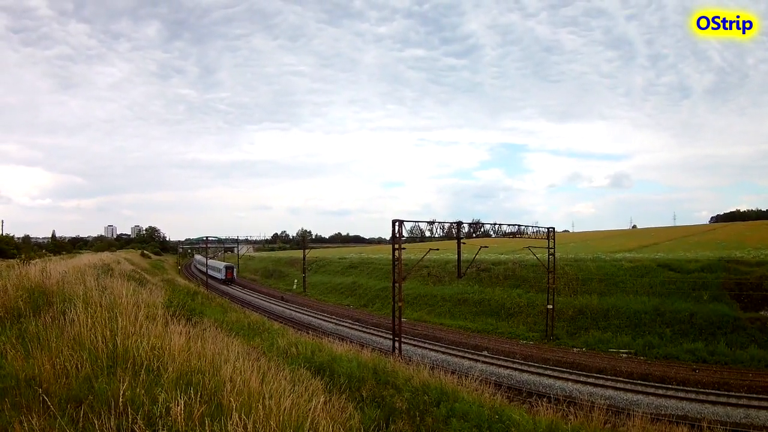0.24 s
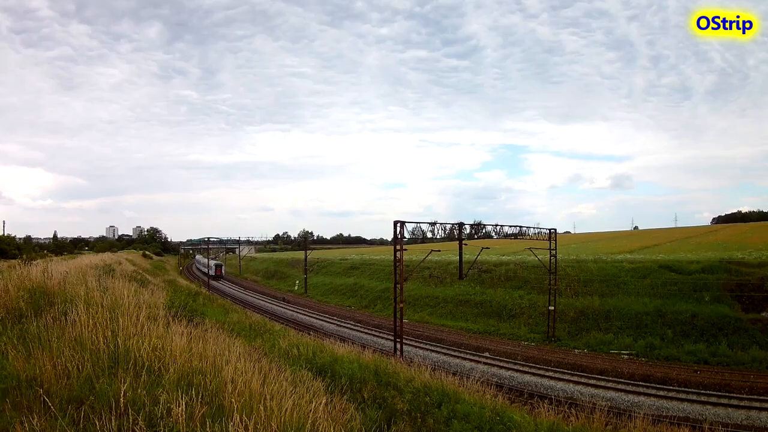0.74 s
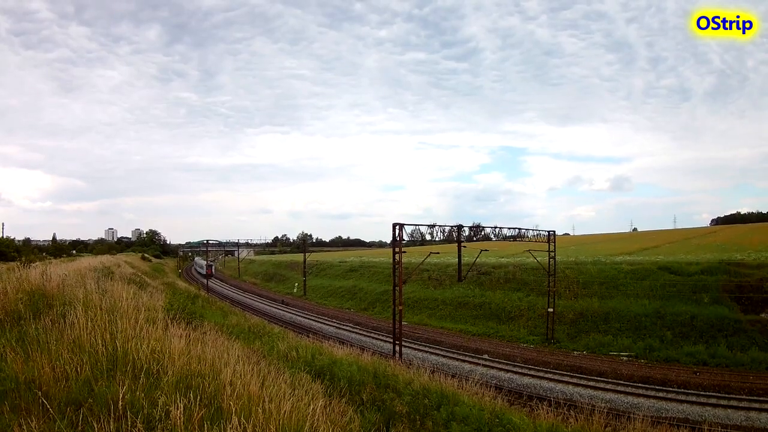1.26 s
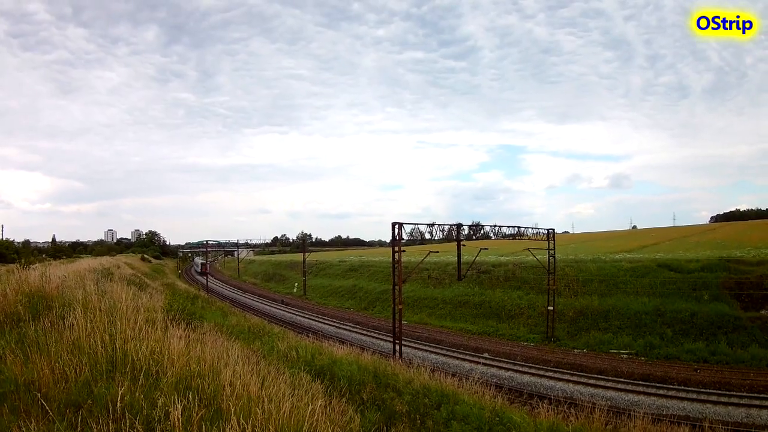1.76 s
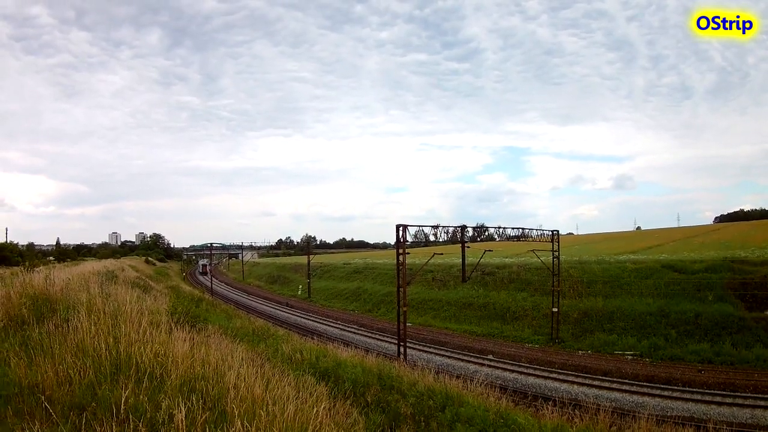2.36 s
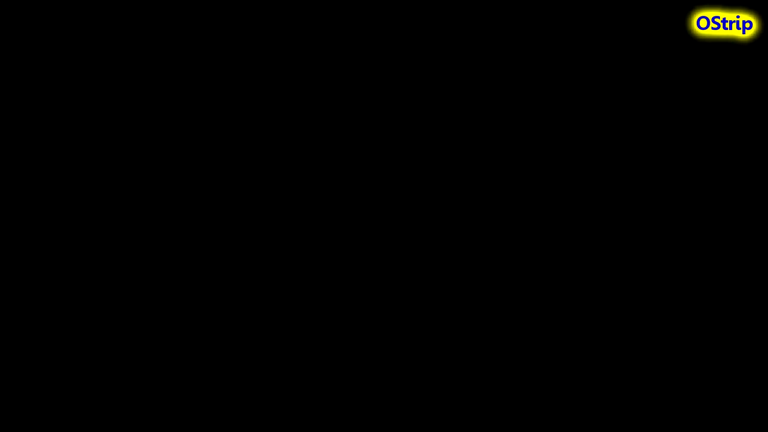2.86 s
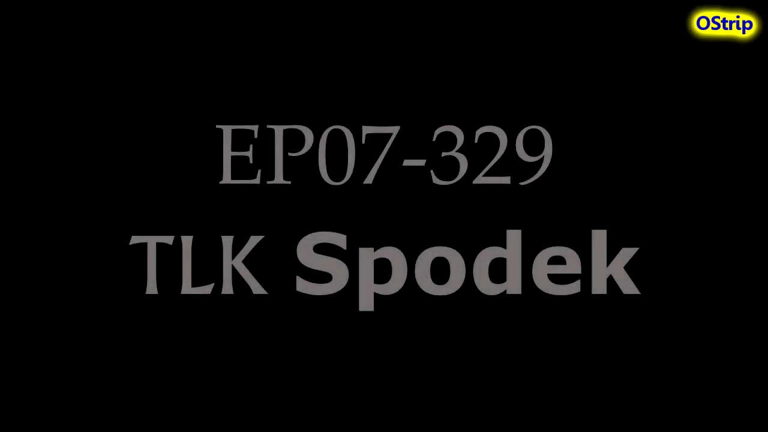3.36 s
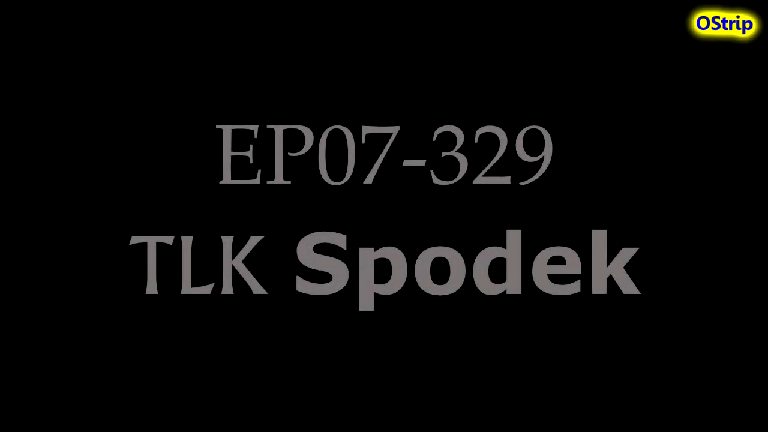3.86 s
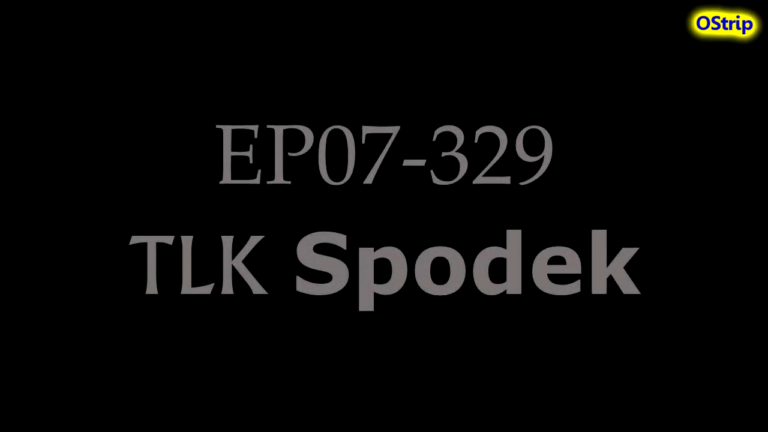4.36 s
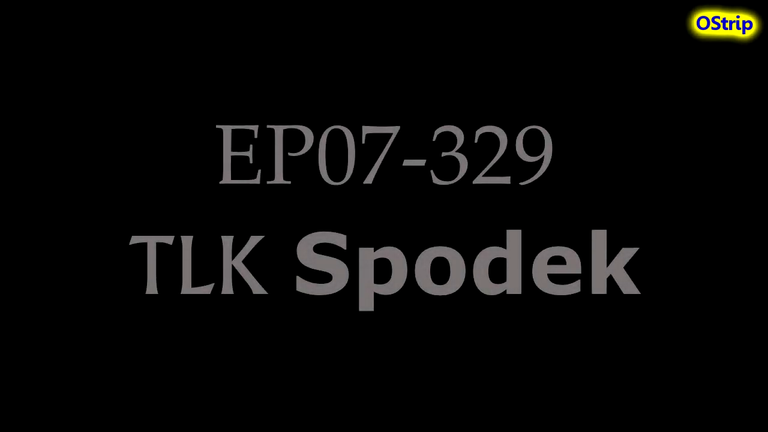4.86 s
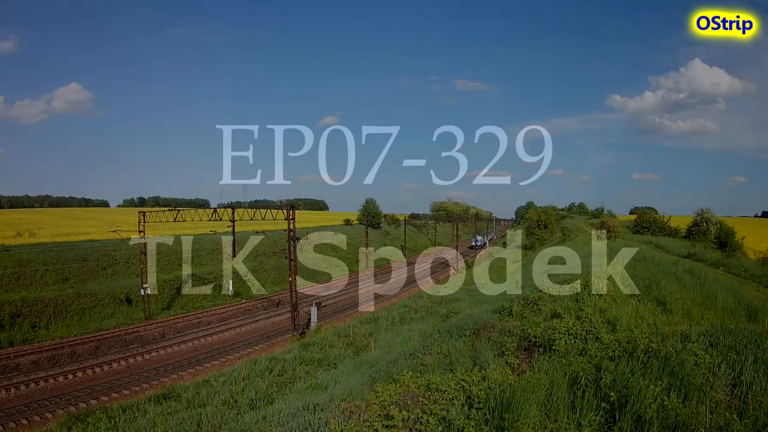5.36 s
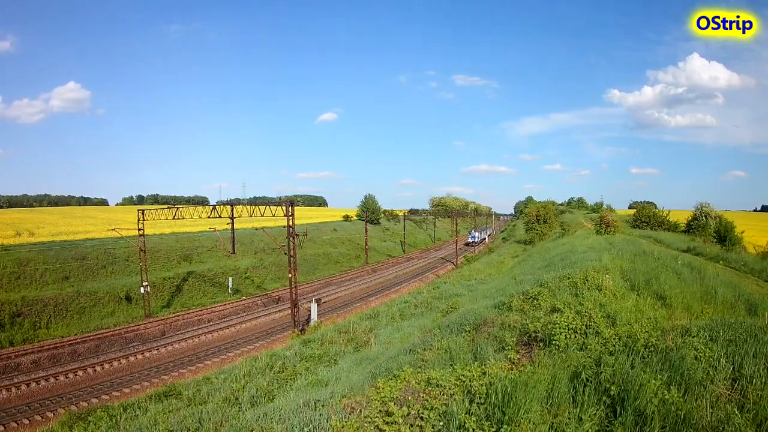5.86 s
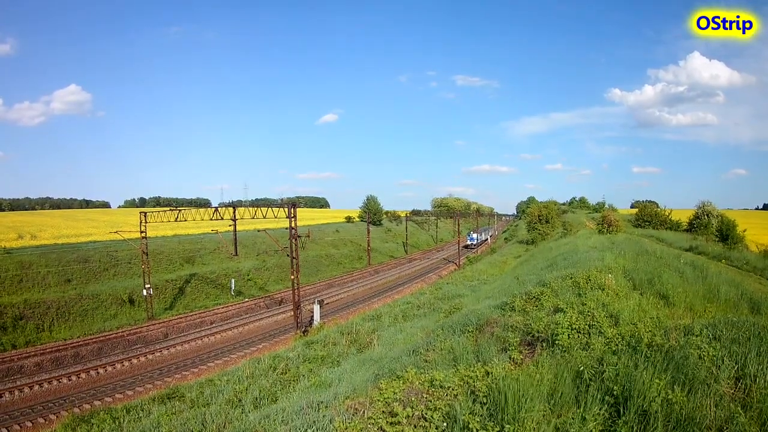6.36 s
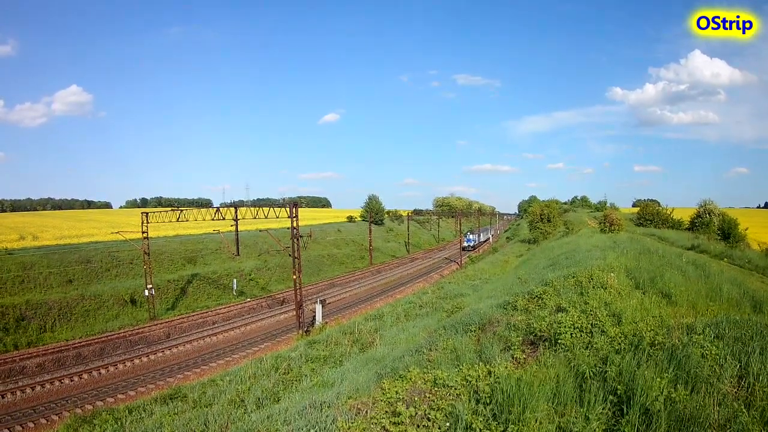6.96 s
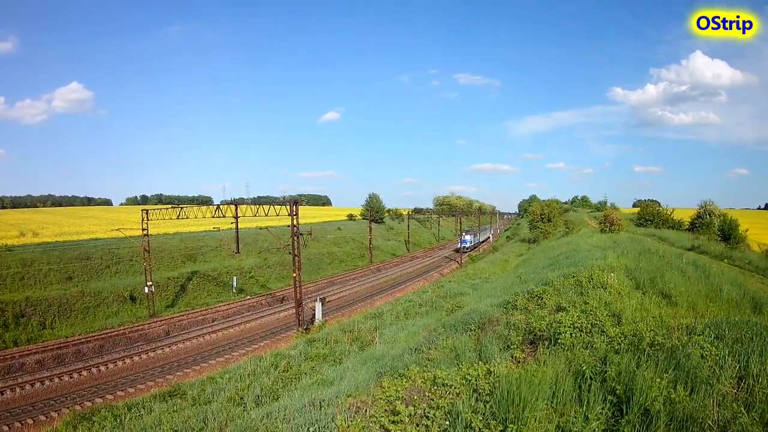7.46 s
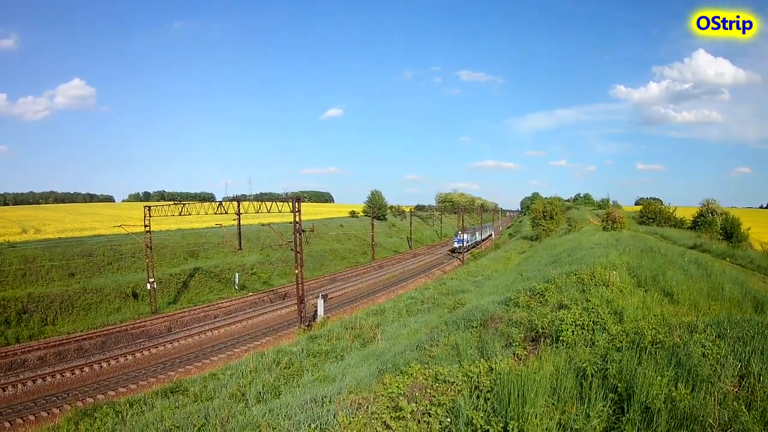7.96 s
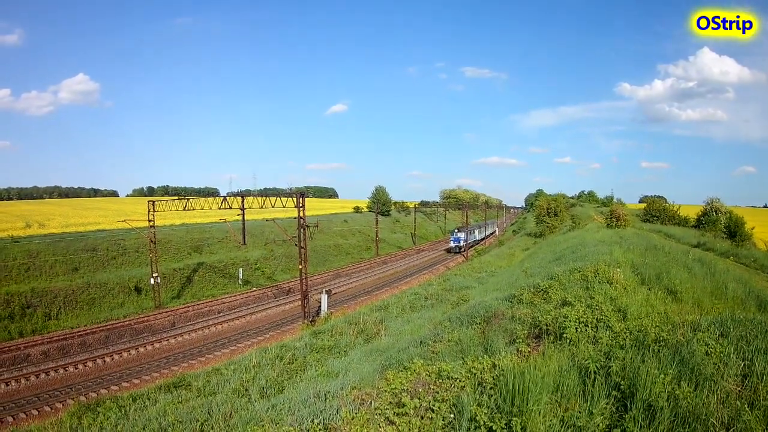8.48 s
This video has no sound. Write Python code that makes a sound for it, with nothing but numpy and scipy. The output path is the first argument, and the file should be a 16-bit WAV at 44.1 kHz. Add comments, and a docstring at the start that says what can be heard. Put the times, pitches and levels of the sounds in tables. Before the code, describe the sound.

In open fields by a wood, a close songbird repeats high buzzes and whistles, growing louder, then holds a throbbing note over the dying roar of a departing train. A quiet stretch follows, with faint, echoing whistles and a trill from far birds. Wind rumble and light hiss rise with the rush of an approaching electric train. The near bird repeats its song, joined by a few thumps and metallic clanks.

```python
"""Open fields by a wood: a train rolls away and fades out, leaving a low hush and far birds. A second place
fades in with wind, hiss and an approaching electric train, all shaped noise, joined by thumps and clanks.
Up front a songbird sings twice: ten buzz-and-whistle syllables, then a long throbbing note. Its voice is
a slightly unsteady near sine that warms up through each song and echoes off a bank and the woods."""
import sys
import numpy as np
from scipy import signal
from scipy.fft import rfft, irfft, next_fast_len
from scipy.io import wavfile
from scipy.ndimage import uniform_filter1d

SR = 44100
rng = np.random.default_rng(int(sys.argv[2]) if len(sys.argv) > 2 else 0)


def wav_out(sig):
    """Save sig, one row per channel (or a flat mono array), as 16-bit PCM at SR to the path in sys.argv[1]."""
    wavfile.write(sys.argv[1], SR, np.round(np.clip(np.atleast_2d(sig).T, -1, 1) * 32767).astype(np.int16))


N = 384552

# EQ curves of the noise beds: (frequency [Hz], relative density [dB])
WOODS_EQ = [(25, -55), (48, -36), (62, -8), (85, -2), (277, -4), (686, -10), (1490, -18), (3140, -18),
            (4570, -22), (7200, -35), (12600, -33), (14800, -47)]
WIND_EQ = [(8.8, -47), (15, -1.5), (97, -1), (275, -10.5), (418, -13.5), (524, -14), (700, -19), (910, -51),
           (1540, -120)]
HISS_EQ = [(1180, 15), (2000, -1.5), (5240, -11), (7450, -6.5), (10100, -9), (12900, -6), (13800, -33),
           (14200, -41), (14800, -60)]
LEAVING_EQ = [(12, -40.5), (22, -18), (45, -10.5), (65, -22.5), (142, -26.5), (354, -21), (669, -3),
              (1010, -6.5), (1620, -13.5), (2020, -24), (2520, -24.5), (4510, -36), (7020, -49),
              (11500, -49.5), (14800, -73.5)]
ARRIVING_EQ = [(240, -50), (400, -13.5), (560, -13.5), (715, -5.5), (819, -0.5), (1200, 1), (1440, -11.5),
               (2520, -23), (3500, -20.5), (4550, -19), (7700, -120)]
# resonances of the trains: (centre [Hz], width [Hz], boost [dB])
LEAVING_RINGS = [(798, 75, 6.5), (1002, 30, 8.5), (1076, 50, 7.5), (1365, 35, 8), (1588, 35, 6.5),
                 (2062, 83, -3.5), (2460, 230, 4.5), (6930, 300, 12.5)]
ARRIVING_RINGS = [(1176, 180, 6.5)]
# swell of the approaching train, ahead of the fade-in: (time [s], level [dB])
APPROACH = [(5.1, -51), (6.0, -47.5), (6.5, -47), (7.7, -43.5), (8.0, -38.5), (8.3, -38.8), (8.72, -35)]
# dull thumps: (time [s], level [dB])
THUMPS = [(5.881, -37), (7.812, -23.5), (8.158, -25.5)]
# short clanks: (time [s], level [dB], first pitch [Hz], last pitch [Hz])
CLANKS = [(7.85, -33, 1275, 1210), (8.076, -17.5, 1200, 1186), (8.081, -20.5, 1010, 695),
          (8.095, -25, 1130, 1040), (8.195, -25.5, 816, 820), (8.29, -27, 1260, 1207),
          (8.398, -29, 1223, 1180), (8.521, -29, 1290, 1200), (8.678, -27, 1216, 1110)]
# far bird slurs: (start [s], length [s], first [Hz], middle [Hz], last [Hz], relative level [dB])
FAR_WHISTLES = [ (2.767, .065, 3650, 3500, 3350, -66), (2.915, 0.049, 3880, 3800, 3700, -61),
                (2.955, .09, 3650, 2880, 2880, -66), (3.155, .048, 2410, 2420, 2450, -64),
                (3.265, .075, 2950, 3020, 2880, -66.5), (3.459, .15, 2310, 2270, 2240, -69),
                (3.619, .04, 2180, 2120, 2070, -68), (4.167, .1, 1487, 1580, 1620, -73),
                (4.31, 0.062, 1687, 2000, 2120, -61), (4.37, .06, 8100, 7800, 7900, -77),
                (4.39, 0.2, 2224, 2154, 2097, -63), (4.455, .115, 6000, 3350, 2610, -63),
                (4.55, .087, 1850, 1840, 1830, -64.5), (4.59, .035, 5700, 5000, 4550, -75),
                (4.623, .26, 2427, 2520, 2565, -67), (4.7, .03, 6200, 5400, 5000, -71),
                (4.75, .03, 6300, 5600, 5360, -70), (4.798, .03, 6200, 5500, 5200, -70),
                (4.797, 0.162, 1570, 1643, 1670, -67), (4.84, .08, 3950, 4090, 4150, -66),
                (4.91, .076, 3900, 3200, 2690, -62), (4.994, .14, 2280, 2480, 2560, -61.5),
                (5.047, .23, 1944, 2170, 2270, -63), (5.165, 0.081, 2800, 3390, 3070, -65.5),
                (5.305, .12, 2550, 3205, 3130, -64), (5.349, .11, 2890, 2973, 3006, -58),
                (5.584, 0.047, 2130, 2030, 1960, -58), (5.673, .13, 1850, 2050, 2065, -62),
                (5.821, .096, 2300, 2485, 2610, -60.5), (5.95, 0.34, 2140, 2130, 2117, -63),
                (6.08, .067, 2740, 2730, 2720, -67)]
# contour of the far trill: (time [s], centre pitch [Hz], relative level [dB])
FAR_TRILL = [(3.0, 4990, -79), (3.3, 4700, -75), (3.7, 4290, -68.5), (3.85, 3250, -64.5),
             (4.5, 3100, -67.5), (4.7, 3300, -74), (5.0, 3295, -70), (5.3, 2990, -93)]
# songbird's overtones: (harmonic number, level against the fundamental at gain 0.17 [dB])
OVERTONES = [(2, -40.5), (3, -35.5)]
# two songs of ten syllables: (buzz start [s], whistle end [s])
SONGS = [
    [(0.678, 0.787), (0.8428, 0.954), (1.011, 1.1234), (1.1741, 1.2827), (1.3259, 1.4359), (1.4772, 1.5893),
     (1.629, 1.7366), (1.7737, 1.8865), (1.923, 2.0368), (2.0754, 2.187)],
    [(6.9775, 7.0817), (7.141, 7.2547), (7.3112, 7.4211), (7.4669, 7.581), (7.6254, 7.7383),
     (7.7747, 7.8913), (7.9277, 8.039), (8.0745, 8.1863), (8.225, 8.3356), (8.3759, 8.4874)],
]
# contour of a buzz: (share of its length, soft level [dB], full-voice level [dB],
# dip between pulses [dB], unscaled pitch sag [Hz], pulse sweep either way [Hz])
BUZZ_SHAPE = [(-.33, -29.5, -45, 16, 70, 330), (-.2, -19, -32.5, 16.5, 70, 340),
              (0, -10, -12, 16, 70.5, 350), (.17, -4.5, -4.5, 15.5, 70, 340), (.3, -1.4, -1, 12.5, 60, 320),
              (.55, 0, -1, 8, 0, 280), (.9, -2.5, -1.5, 7.5, -105, 225), (1.05, -7.5, -5, 8.5, -150, 209),
              (1.19, -27, -26, 8.5, -160, 210)]
# pitch scoop of a whistle: (time from its end [s], unscaled offset [Hz])
WHISTLE_BEND = [(-.062, 2), (-.04, -170), (-.016, 1), (-.008, 3)]
# release of a whistle: (time from its end [s], level [dB])
WHISTLE_RELEASE = [(-.009, 0), (-.005, -1.5), (-.003, -4), (0, -7), (.003, -26), (.008, -45)]
# cues of the long notes: (start [s])
LONG_NOTE_STARTS = [2.24, 8.544]
# contour of a long note: (time from its start [s], pitch [Hz], rms level [dB], throb depth [dB])
LONG_NOTE = [(0, 4960, -52, 4), (.015, 4860, -34.5, 3), (.03, 4744, -27.5, 8.5), (.065, 4634, -24.5, 7),
             (.1, 4680, -21, 5.5), (.15, 4700, -20, 5), (.42, 4665, -19.5, 3), (.5, 4702, -19, 2.5),
             (.575, 4695, -20, 3.5), (.61, 4670, -25.5, 5.5), (.67, 4635, -27.5, 5), (.7, 4613, -31, 6),
             (.715, 4400, -51, 8)]


def undb(db):
    """Decibels to gain."""
    return 10 ** (np.asarray(db) / 20)


def curve(table, at):
    """Reads each column of a table as an envelope along its first column."""
    points, *columns = np.transpose(table)
    return [np.interp(at, points, c) for c in columns]


def add(out, start_s, sound):
    """Mixes a short sound in on its cue."""
    i = int(start_s * SR)
    out[i:i + len(sound)] += sound[:N - i]


def fade(x, seconds):
    """Fades both ends."""
    t = np.arange(len(x)) / SR
    return x * np.clip(np.minimum(t, t[::-1]) / seconds, 0, 1)


def tone(hz, gain):
    """A sine that follows pitch and gain."""
    return gain * np.sin(2 * np.pi * np.cumsum(hz) / SR + 2 * np.pi * rng.random())


def wander(rate_hz):
    """A smooth random modulator with a spread near 1."""
    hold = int(SR / rate_hz)
    steps = np.repeat(rng.standard_normal(N // hold + 1), hold)
    return 1.44 * uniform_filter1d(uniform_filter1d(steps, hold), hold)[:N]


def noise_bed(eq, band_hz, rings=(), *, flicker_db, flicker_hz=9):
    """Shaped noise, rms near 1 inside the band; each octave flickers on its own."""
    size = next_fast_len(N)
    hz = np.arange(1, size // 2 + 2) * SR / size
    eq_hz, eq_db = np.transpose(eq)
    db = np.interp(np.log(hz), np.log(eq_hz), eq_db, -200, -200)
    db += sum(boost / (1 + (2 * (hz - centre) / width) ** 2) for centre, width, boost in rings)
    gain = undb(db)
    in_band = (hz > band_hz[0]) & (hz < band_hz[1])
    gain /= np.sqrt(np.sum(gain[in_band] ** 2) * 2 / size)
    spectrum = rfft(rng.standard_normal(size)) * gain
    octave = np.log2(hz / 1000)
    bands = (irfft(spectrum * np.clip(1 - abs(octave - k), 0, 1), size)[:N] for k in range(-6, 5))
    return sum(band * undb(flicker_db * wander(flicker_hz)) for band in bands)


def echoes(x, t60_s, predelay_s):
    """Scattered returns from trees and ground: a noise tail of unit energy."""
    t = np.arange(int(t60_s * SR)) / SR
    tail = rng.standard_normal(len(t)) * undb(-60 * t / t60_s) * (t > predelay_s)
    return signal.fftconvolve(x, tail / np.sqrt(np.sum(tail ** 2)))[:N]


def woods():
    """A steady low hush under everything."""
    return noise_bed(WOODS_EQ, (25, 15000), flicker_db=.04) * undb(-59.5)


def wind():
    """A low rumble that breathes in gentle gusts."""
    rumble = noise_bed(WIND_EQ, (20, 300), flicker_db=.5, flicker_hz=6.9)
    return rumble * undb(-42 + 1.33 * wander(2.495))


def hiss():
    """A thin, flickering hiss."""
    return noise_bed(HISS_EQ, (6500, 9000), flicker_db=1.75) * undb(-58.5)


def leaving_train():
    """A rolling roar with ringing mids."""
    return noise_bed(LEAVING_EQ, (450, 1800), LEAVING_RINGS, flicker_db=.5) * undb(-31.5)


def arriving_train(t):
    """The electric train's midrange rush swells as it nears."""
    rush = noise_bed(ARRIVING_EQ, (700, 1700), ARRIVING_RINGS, flicker_db=1.5, flicker_hz=14)
    return rush * undb(curve(APPROACH, t)[0])


def knock(db, first_hz, last_hz, t60_s):
    """A damped sine hit whose pitch settles fast."""
    t = np.arange(int(t60_s * SR)) / SR
    hz = last_hz + (first_hz - last_hz) * np.exp(-t / .0113)
    attack = np.minimum(t / .0017, 1)
    return tone(hz, undb(db - 60 * t / t60_s) * attack)


def thumps_and_clanks():
    """Thumps dive into the bass; clanks ring briefly in the mids."""
    out = np.zeros(N)
    for start, db in THUMPS:
        add(out, start, knock(db, first_hz=360, last_hz=64.6, t60_s=.064))
    for start, db, first_hz, last_hz in CLANKS:
        add(out, start, knock(db, first_hz, last_hz, t60_s=.076))
    return out


def far_whistles():
    """Wavering slurs of distant birds, washed in echo."""
    out, waver = np.zeros(N), wander(110)
    for start, length, first_hz, middle_hz, last_hz, db in FAR_WHISTLES:
        u, i = np.linspace(0, 1, int(length * SR)), int(start * SR)
        glide_hz = first_hz + (last_hz - first_hz) * u
        arch_hz = (4 * middle_hz - 2 * first_hz - 2 * last_hz) * u * (1 - u)
        hz = (glide_hz + arch_hz) * (1 + .015 * waver[i:i + len(u)])
        envelope = np.clip(6 * np.minimum(u, 1 - u), 0, 1)
        add(out, start, tone(hz, undb(db) * envelope))
    nearer = np.arange(N) / SR < 4  # the first singer sits nearer, with less echo
    direct_db, send_db = np.where(nearer, 1, -2.5), np.where(nearer, -8, 4)
    direct = undb(direct_db + 3 * wander(60)) * out
    return direct + echoes(undb(send_db) * out, t60_s=.9, predelay_s=.0035)


def far_trill(chirps_per_s=20):
    """A distant bird's quick run of falling chirps, more echo than direct sound."""
    out = np.zeros(N)
    u = np.linspace(0, 1, int(.035 * SR))
    for k, (late, detune) in enumerate(rng.standard_normal((46, 2))):
        start = FAR_TRILL[0][0] + k / chirps_per_s + .015 * abs(late)
        centre_hz, db = curve(FAR_TRILL, start)
        hz = centre_hz * (1 + .07 * detune + .75 * (.5 - u))
        add(out, start, tone(hz, undb(db) * np.sin(np.pi * u)))
    return undb(5) * out + undb(11) * echoes(out, t60_s=.43, predelay_s=.003)


def voice(hz, gain):
    """The songbird's near sine; its overtones grow faster than the fundamental."""
    phase = 2 * np.pi * np.cumsum(hz) / SR + 2 * np.pi * rng.random()
    brightness = (gain / .17) ** 2.1
    overtones = sum(undb(db) * np.sin(k * phase) for k, db in OVERTONES)
    return gain * (np.sin(phase) + brightness * overtones)


def rasp(length_s, band_hz, decay_s):
    """Air rasps through the throat before a note settles."""
    t = np.arange(int(length_s * SR)) / SR
    bandpass = signal.butter(2, band_hz, "band", fs=SR, output="sos")
    air = signal.sosfilt(bandpass, rng.standard_normal(len(t)))
    return fade(air / air.std() * np.exp(-t / decay_s), .008)


def buzz(out, start, k, waver, flutter, drift):
    """Syllable k's buzz: a burst of quick pitch sweeps, higher, longer and louder as the song warms up."""
    length_s, centre_hz = .052 + .0007 * k, 5124 + 19 * k
    db = -13.5 - 13.5 * np.exp(-k / 1.9)
    pulse_hz = 176.5 + 2 * rng.standard_normal()
    t = np.arange(-.018 * SR, (length_s + .023) * SR) / SR
    u, span = t / length_s, slice(int(start * SR), int(start * SR) + len(t))
    soft_db, full_db, depth_db, sag_hz, sweep_hz = curve(BUZZ_SHAPE, u)
    soft = max(1 - (k / 6) ** 2, 0)  # early buzzes are rounder, with deeper dips between pulses
    swell_db = full_db + soft * (soft_db - full_db)
    beat = 2 * np.pi * pulse_hz * (t + .061 * t * (1 - u)) + .2 * drift[span]  # the pulses slow down
    dip_db = (depth_db + 2 * soft) * (.5 - .5 * np.cos(beat)) ** 1.31
    sag_hz *= .35 + .09 * k  # later buzzes sag further
    hz = centre_hz + sag_hz + sweep_hz * np.sin(beat + .21) + 45 * waver[span]
    gain = undb(db + swell_db - dip_db + .4 * flutter[span])
    add(out, start + t[0], fade(voice(hz, gain), .0034))


def whistle(out, end, k, waver, flutter):
    """Syllable k's whistle: soft ones swell to the end, strong ones level off and drop in pitch."""
    shy, effort = np.exp(-k / 2.45), np.clip((k - .7) / 7.6, 0, 1)
    db, swell_s = -15 - 16 * shy, .046 - .012 * shy
    top_hz = min(4125 + 33 * k, 4385)
    t = np.arange(-.06 * SR, .008 * SR) / SR
    span = slice(int(end * SR), int(end * SR) + len(t))
    swell_left = np.clip((-.007 - t) / (swell_s - .007), 0, None)
    swell_db = -10.5 * swell_left ** (1.7 + 2.4 * effort ** 1.5) - 8 * np.clip(swell_left - 1, 0, None)
    release_db = curve(WHISTLE_RELEASE, t)[0]
    bend_hz = (.77 + .39 * effort) * curve(WHISTLE_BEND, t)[0]
    drop_hz = 130 * effort * np.clip((t + .009) / .0099, 0, 1)
    hz = top_hz + bend_hz - drop_hz + 21 * waver[span]
    gain = undb(db + swell_db + release_db + .15 * flutter[span])
    add(out, end + t[0], fade(voice(hz, gain), .0033))
    add(out, end - .062, undb(db - 33) * rasp(.065, band_hz=(3000, 3900), decay_s=.056))


def long_note(out, start, waver, flutter, drift, throb_hz=93.3, first_dip_s=.03):
    """The held closing note: pitch and level dip together in a fast throb."""
    span = slice(int(start * SR), min(int((start + LONG_NOTE[-1][0]) * SR), N))
    t = np.arange(span.stop - span.start) / SR
    centre_hz, db, depth_db = curve(LONG_NOTE, t)
    beat = 2 * np.pi * throb_hz * (t - first_dip_s) + .15 * drift[span]
    dip = (.5 + .5 * np.cos(beat)) ** 3.7
    dip -= dip.mean()
    hz = centre_hz - 85 * dip + 10 * waver[span] + 5 * drift[span]
    gain = np.sqrt(2) * undb(db - depth_db * dip + .15 * flutter[span])
    out[span] += voice(hz, gain)
    add(out, start, undb(-46.5) * rasp(.13, band_hz=(2100, 5100), decay_s=.054))


def songbird():
    """Two close songs, with a short slap off the bank and a long tail from the woods."""
    out = np.zeros(N)
    waver, flutter, drift = wander(500), wander(200), wander(60)  # the voice box is never quite steady
    for song in SONGS:
        for k, (start, end) in enumerate(song):
            buzz(out, start, k, waver, flutter, drift)
            whistle(out, end, k, waver, flutter)
    for start in LONG_NOTE_STARTS:
        long_note(out, start, waver, flutter, drift)
    bank_slap = undb(-24.5) * echoes(out, t60_s=.09, predelay_s=.014)
    woods_tail = undb(-39) * echoes(out, t60_s=1.6, predelay_s=.01)
    return out + bank_slap + woods_tail


def scene():
    """Mono mix: the first train fades out, the second place fades in; the rest bypasses the fades."""
    t = np.arange(N) / SR
    fade_out = np.interp(t, [.4, 2.975], [1, 0])
    fade_in = np.interp(t, [5.105, 7.15], [0, 1])
    beds = leaving_train() * fade_out + (wind() + arriving_train(t) + hiss()) * fade_in + woods()
    return (beds + songbird() + far_whistles() + far_trill() + thumps_and_clanks())[None]


def record(dry):
    """A steep low-pass takes off the top treble."""
    return signal.sosfilt(signal.ellip(10, .2, 70, 14950, fs=SR, output="sos"), dry)


dry = scene()
out = record(dry)
wav_out(out)
```